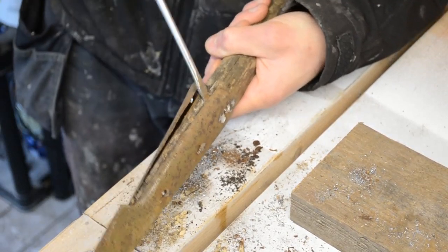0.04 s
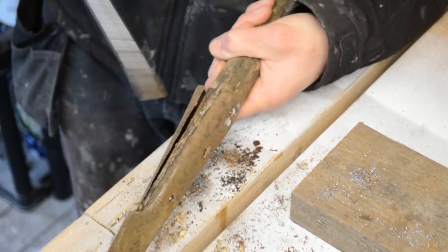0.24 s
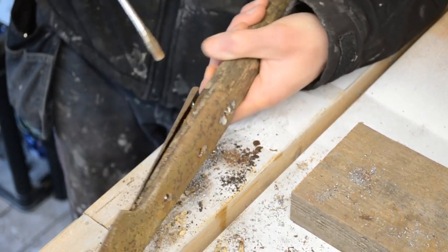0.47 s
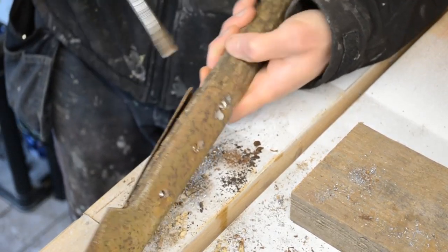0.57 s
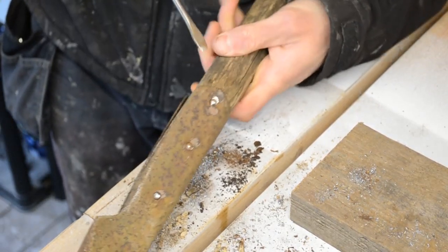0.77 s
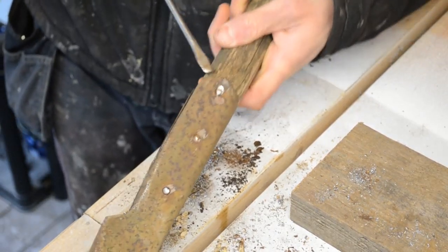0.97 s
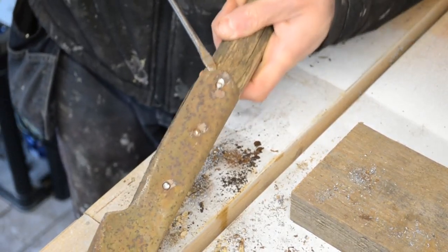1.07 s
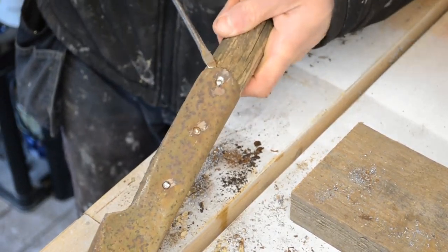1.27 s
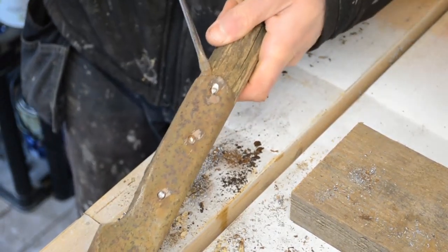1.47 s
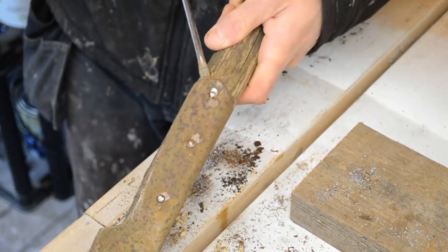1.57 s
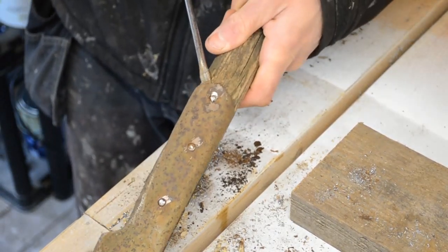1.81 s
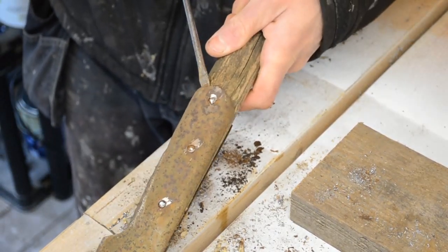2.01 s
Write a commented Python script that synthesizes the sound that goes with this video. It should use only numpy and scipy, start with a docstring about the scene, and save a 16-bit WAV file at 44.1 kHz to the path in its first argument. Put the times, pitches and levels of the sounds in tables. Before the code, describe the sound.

Loud woody rattle of a pried metal blade slapping its handle, then a quieter screwdriver knock

```python
"""A rusty blade, sprung free by a screwdriver, chatters against its rotten wooden handle: rings plus noise.
Splinters crack meanwhile, as puffs of noise, and later the tip knocks and grazes its way back into the gap.
A jacket sleeve and hands rub throughout (uneven noise), and the handle bumps softly (low falling tones).
Behind it all lie a small workshop's short echo, its steady air noise and a thin, very high whine."""
import sys
import numpy as np
from scipy import signal
from scipy.fft import rfft, irfft
from scipy.io import wavfile
from scipy.ndimage import uniform_filter1d

SR = 44100
rng = np.random.default_rng(int(sys.argv[2]) if len(sys.argv) > 2 else 0)


def wav_out(sig):
    """Save sig, one row per channel (or a flat mono array), as 16-bit PCM at SR to the path in sys.argv[1]."""
    wavfile.write(sys.argv[1], SR, np.round(np.clip(np.atleast_2d(sig).T, -1, 1) * 32767).astype(np.int16))


N = 90404
T = np.arange(N) / SR  # time of every sample, in seconds

# In the tables, t60 is the time a sound takes to fade by 60 dB.


def chatter():
    """The blade springs free and slaps the handle, weaker by the end; each slap rings the wood and rasps."""
    # slaps of the blade: t/s, relative level/dB
    slaps = [(0.2033, -5.5), (0.2082, 5), (0.2142, 2), (.2161, 2), (0.2316, 1.5), (0.2381, -5),
             (0.2521, -5), (0.2535, -8.5), (0.2653, -4), (0.2769, -6), (.2928, -5.5), (0.3002, -11.5),
             (0.314, -19), (0.3237, -16.5), (0.3349, -23), (0.3515, -23), (0.3659, -61), (0.3788, -54)]
    # ringing tones of handle and blade: f/Hz, relative level/dB, t60/s
    handle_modes = [(85, -13.5, 0.15), (125.4, -20, 0.29), (168.4, -21.5, 0.076), (228, -5.5, 0.052),
                    (258, -11.5, 0.11), (410, -11.5, 0.084), (442.3, 0, 0.06), (517.4, -2, 0.053),
                    (567, -11.5, 0.04), (776, -15.5, 0.091), (1037, -22.5, 0.066), (1347, -20.5, 0.042),
                    (1950, -28, 0.053)]
    # colour of a slap's rasp: f/Hz, relative level/dB
    slap_colour = [(60, -13), (200, -8.5), (330, -3), (420, 2), (575, 7), (650, -5.5), (900, -9),
                   (1400, -8.5), (2100, -20), (3100, -43), (6000, -39.5), (15000, -74)]
    ring_db, rasp_db, rasp_t60_s = -17.5, -31, 0.09

    out = np.zeros(N)
    body = ring(handle_modes, rise_s=0.0009)
    for start_s, db in slaps:
        add(out, start_s, amp(db + ring_db) * body)
        add(out, start_s, amp(db + rasp_db) * burst(slap_colour, rasp_t60_s))
    return out


def splinters():
    """Dry fibres snap under the tip and set the steel shaft ringing faintly; a crumb drops later."""
    # cracks: t/s, level/dB, t60/s
    cracks = [(0.1772, -44, 0.036), (0.2053, -40.5, 0.11), (0.215, -57, .06), (0.2369, -39.5, .08),
              (0.2486, -42, .05), (0.263, -47, .04), (0.2718, -43, .05), (0.294, -52, .04)]
    # colour of a crack: f/Hz, relative level/dB
    crack_colour = [(200, -28), (900, -7), (1800, 8.5), (3000, -3.5), (4600, -15.5), (5600, -22),
                    (8000, -19), (15000, -29.5)]
    # narrow band in which the steel shaft rings: f/Hz, relative level/dB
    shaft_colour = [(3600, -50), (4300, -14), (4570, 0), (4850, -14), (5500, -50)]
    # colour of the falling crumb: f/Hz, relative level/dB
    crumb_colour = [(300, -17), (1200, -4), (4000, -3), (6000, -16), (9000, -11), (15000, -18)]
    shaft_db, shaft_t60_s = -16, 0.11  # level is relative to the crack
    crumb_s, crumb_db, crumb_t60_s = 0.5875, -53.5, 0.043

    out = np.zeros(N)
    for start_s, db, t60_s in cracks:
        add(out, start_s, amp(db) * burst(crack_colour, t60_s))
        add(out, start_s, amp(db + shaft_db) * burst(shaft_colour, shaft_t60_s))
    add(out, crumb_s, amp(crumb_db) * burst(crumb_colour, crumb_t60_s))
    return out


def knocks():
    """The tip lands in the gap, bounces and settles; each contact rings the wedged parts and clicks."""
    # contacts of the tip: t/s, ring level/dB, click level/dB
    contacts = [(0.9855, -33.5, -27.5), (0.9914, -27.5, -33), (0.9989, -38.5, -45), (1.0185, -45, -40),
                (1.0568, -45, -72), (1.0797, -56, -66)]
    # ringing tones of the wedged tip and handle: f/Hz, relative level/dB, t60/s
    wedge_modes = [(123.3, -16, 0.42), (196, -34, 0.16), (246, 7, 0.06), (432.3, -3, 0.17),
                   (612.3, -15, 0.37), (1157, -13.5, 0.071), (1467, -14, .08), (1900, -10, 0.041),
                   (2180, -16, 0.1), (2590, -17.5, .07), (3700, -20, 0.1), (3920, -32, 0.093),
                   (4450, -32, 0.1)]
    # colour of the tip's click: f/Hz, relative level/dB
    click_colour = [(100, -5), (300, 9.5), (900, -8), (1200, 0.5), (1500, 6), (2450, -0.5), (3000, -20),
                    (3800, -11.5), (4600, -19), (5200, -25), (6500, -31), (9000, -44), (15000, -54)]

    out = np.zeros(N)
    body = ring(wedge_modes, rise_s=0.0014)
    for start_s, ring_db, click_db in contacts:
        add(out, start_s, amp(ring_db) * body)
        add(out, start_s, amp(click_db) * burst(click_colour, t60_s=0.046))
    return out


def grazes():
    """Short gritty scrapes of steel on rust and wood as the tip lands and is pushed home."""
    # scrapes: t/s, length/s, level/dB
    scrapes = [(0.9855, 0.0094, -46.5), (1.032, 0.077, -66)]
    # colour of a scrape: f/Hz, relative level/dB
    graze_colour = [(300, -26), (2500, -18), (3300, 1), (4500, 3.5), (5300, -11.5), (6800, -10.5),
                    (9000, -19.5), (12000, -20.5), (15000, -26)]

    out = np.zeros(N)
    for start_s, length_s, db in scrapes:
        t = np.arange(0, length_s, 1 / SR)
        swell = np.sin(np.pi * np.sqrt(t / length_s))  # loudest a quarter of the way in
        grit = noise(graze_colour, size=8192)[:len(t)]
        add(out, start_s, amp(db) * swell * grit)
    return out


def bumps():
    """Cushioned low bumps with a falling pitch and a little scuff as the grip shifts."""
    # soft bumps of the handle: t/s, length/s, starting f/Hz, level/dB
    soft_bumps = [(.465, 0.03, 87, -49), (0.579, 0.068, 298, -58.5), (.645, 0.061, 100, -45),
                  (.645, 0.047, 200, -53), (0.726, 0.056, 93, -55.5), (1.0, 0.11, 129.7, -53),
                  (1.109, 0.02, 99, -49), (1.585, 0.045, 299, -52.5), (1.612, 0.081, 147.3, -55)]
    # colour of a bump's scuff: f/Hz, relative level/dB
    scuff_colour = [(30, -44), (90, 9), (220, -9), (500, -23), (1500, -47), (15000, -66)]
    pitch_drop, scuff_share = 0.18, 0.6  # fraction of the pitch lost; scuff compared with thud

    out = np.zeros(N)
    for start_s, length_s, start_hz, db in soft_bumps:
        t = np.arange(0, length_s, 1 / SR)
        pitch_hz = start_hz * (1 - pitch_drop * t / length_s)
        thud = unit(np.sin(2 * np.pi * np.cumsum(pitch_hz) / SR))
        scuff = unit(noise(scuff_colour, size=8192)[:len(t)])
        swell = np.sin(np.pi * t / length_s)
        add(out, start_s, amp(db) * swell * (thud + scuff_share * scuff))
    return out


def rubbing():
    """Cloth and skin slide: noise with a fine, uneven grain that swells and eases."""
    # loudness of the rubbing over time: t/s, level/dB
    rub_levels = [(0, -58), (.15, -60.5), (.36, -59.5), (.45, -58.5), (.53, -56.5), (.61, -52),
                  (.68, -54.5), (.75, -53), (.83, -53.5), (.89, -57), (.97, -53.5), (1.07, -51),
                  (1.22, -62), (1.31, -59.5), (1.38, -53.5), (1.5, -53), (1.6, -53), (1.69, -58),
                  (1.8, -57.5), (1.89, -55), (1.96, -59), (2.05, -63.5)]
    # colour of the rubbing: f/Hz, relative level/dB
    rub_colour = [(60, -7), (200, -2), (500, 4), (750, -1), (1300, 2.5), (2000, -1.5), (2400, -7),
                  (3000, -7), (5000, -19.5), (7000, -22.5), (12000, -26), (15500, -34)]
    grain_db, grain_s = 0.5, 1 / 340  # typical flicker in level; time it is smoothed over

    grain = unit(uniform_filter1d(rng.standard_normal(N), int(SR * grain_s)))
    rub = unit(noise(rub_colour, N) * amp(grain_db * grain))
    level_db = np.interp(T, *np.transpose(rub_levels))
    return amp(level_db) * rub


def room(x):
    """A short diffuse echo: fading noise in which each pitch band dies at its own speed."""
    # fading time of the workshop's echo: f/Hz, t60/s
    echo_t60 = [(80, 0.32), (400, 0.29), (2000, 0.17), (10000, 0.1)]

    hz, t, bands = signal.stft(rng.standard_normal(SR // 2), SR, nperseg=256)
    fade_db = -60 * t / read(echo_t60, hz)[:, None]
    tail = signal.istft(bands * amp(fade_db), SR, nperseg=256)[1]
    tail[:200] = 0  # samples of silence before the echo arrives
    return signal.fftconvolve(x, tail / np.linalg.norm(tail))[:N]


def air():
    """Steady workshop background noise with a thin electrical whine, a pure tone."""
    # colour of the workshop air: f/Hz, relative level/dB
    air_colour = [(20, -3), (50, 8), (82, 4.5), (125, -4.5), (250, -5), (500, -11), (1000, -3),
                  (1700, -13.5), (3000, -24.5), (5000, -31.5), (10000, -54), (15500, -42)]
    air_db, whine_db, whine_hz = -57.5, -79, 15665

    whine = unit(np.sin(2 * np.pi * whine_hz * T))
    return amp(air_db) * noise(air_colour, N) + amp(whine_db) * whine


def ring(modes, rise_s):
    """The ring of a struck object: a sum of pure tones, each fading at its own speed."""
    t = T[:SR // 2]
    tones = np.zeros(len(t))
    for hz, db, t60_s in modes:
        tones += amp(db - 60 * t / t60_s) * np.sin(2 * np.pi * hz * t)
    return rise(t, rise_s) * tones


def burst(colour, t60_s):
    """A sudden puff of noise that dies away."""
    hiss = noise(colour, size=8192)
    t = T[:len(hiss)]
    return hiss * rise(t, rise_s=0.00042) * amp(-60 * t / t60_s)


def rise(t, rise_s):
    """A soft contact takes a moment to build: a smooth climb from 0 to 1."""
    return 1 - np.exp(-(t / rise_s) ** 2)


def noise(colour, size):
    """Random noise with the given colour (spectrum), scaled to rms 1."""
    hz = np.fft.rfftfreq(size, 1 / SR)
    spectrum = rfft(rng.standard_normal(size)) * amp(read(colour, hz))
    return unit(irfft(spectrum, size))


def read(points, hz):
    """Reads a table between its points, along a log-frequency axis."""
    f, value = np.transpose(points)
    return np.interp(np.log(hz + 1), np.log(f + 1), value)


def unit(x):
    """Scales a sound to rms 1, rms being its average strength."""
    return x / np.sqrt(np.mean(x ** 2) + 1e-20)


def amp(db):
    """Turns decibels into a gain."""
    return 10 ** (np.asarray(db) / 20)


def add(mix, start_s, sound):
    """Mixes a sound in at the given time, cutting off what runs past the end."""
    part = mix[max(round(start_s * SR), 0):][:len(sound)]
    part += sound[:len(part)]


def scene():
    """All sources in the workshop, in mono; only the hard contacts get an echo."""
    room_db = -11
    hits = chatter() + splinters() + knocks() + grazes()
    echo = amp(room_db) * room(hits)
    return (hits + echo + bumps() + rubbing() + air())[None]


def record(dry):
    """The microphone weakens the deepest bass, and the recorder cuts the highest treble."""
    low_cut_hz, treble_limit_hz = 38, 15850
    low_cut = signal.butter(2, low_cut_hz, "high", fs=SR, output="sos")
    treble_cut = signal.firwin(1023, treble_limit_hz, window=("kaiser", 9), fs=SR)
    return signal.oaconvolve(signal.sosfilt(low_cut, dry), treble_cut[None], "same")


dry = scene()
out = record(dry)
wav_out(out)
```